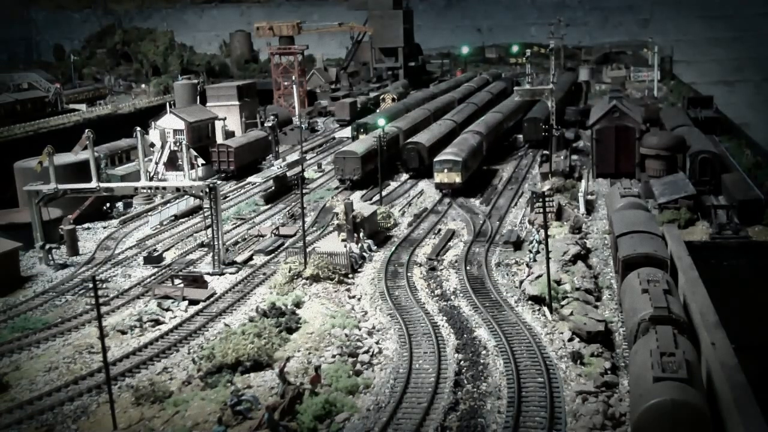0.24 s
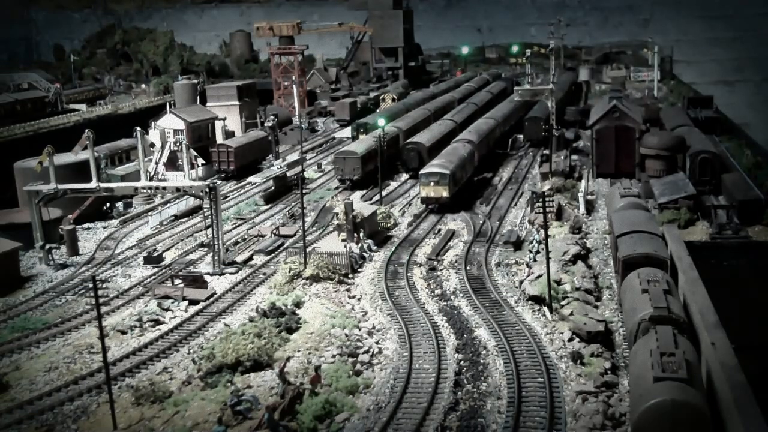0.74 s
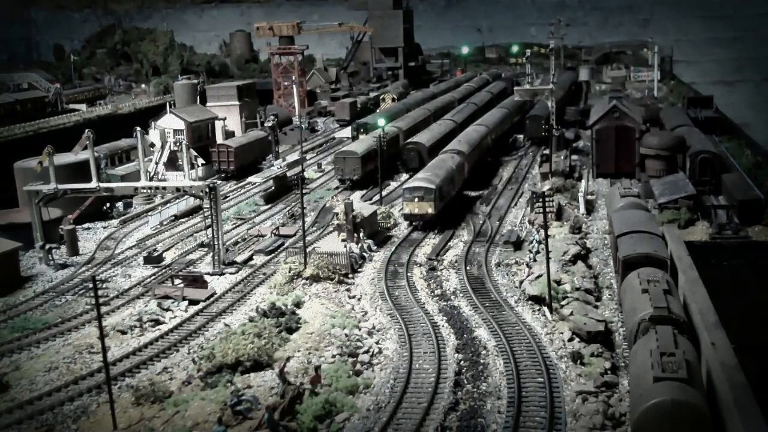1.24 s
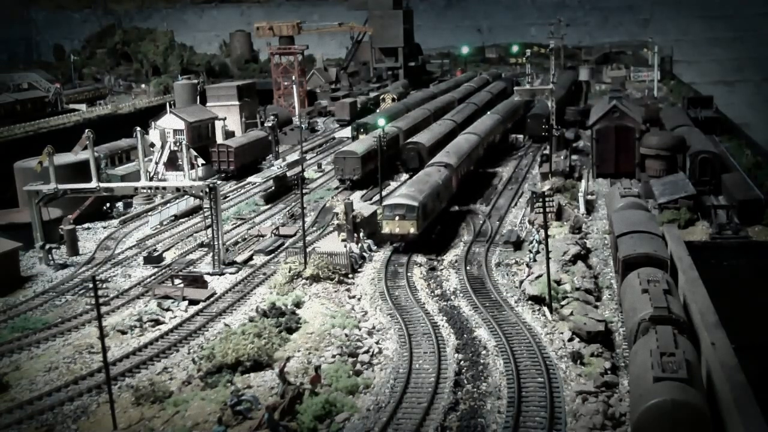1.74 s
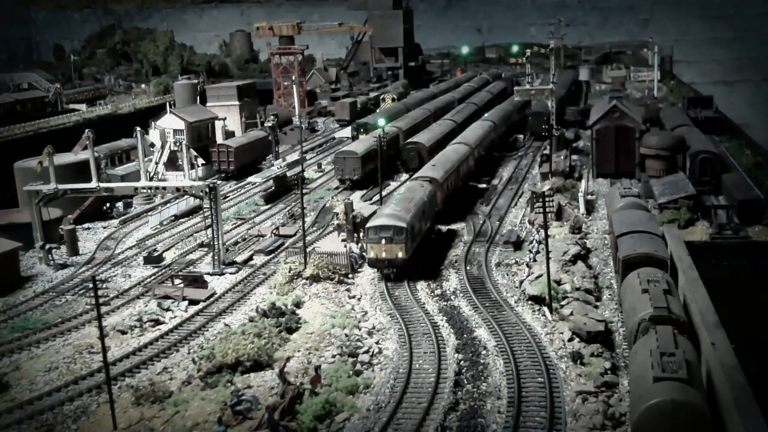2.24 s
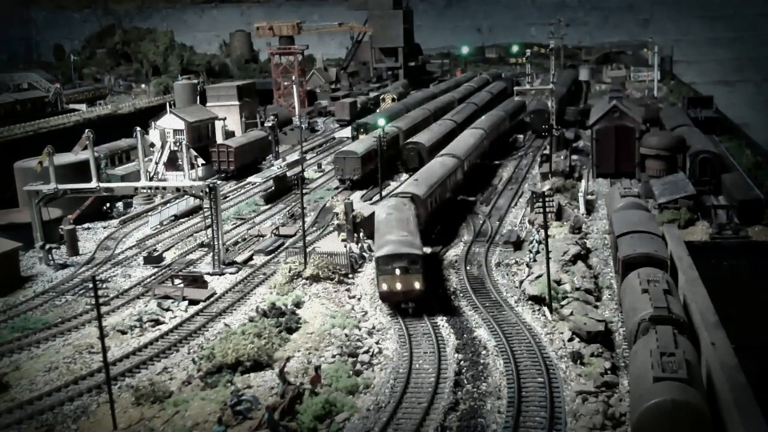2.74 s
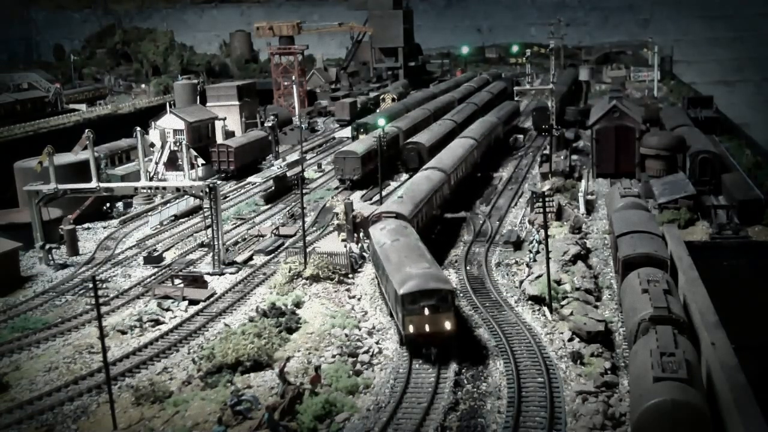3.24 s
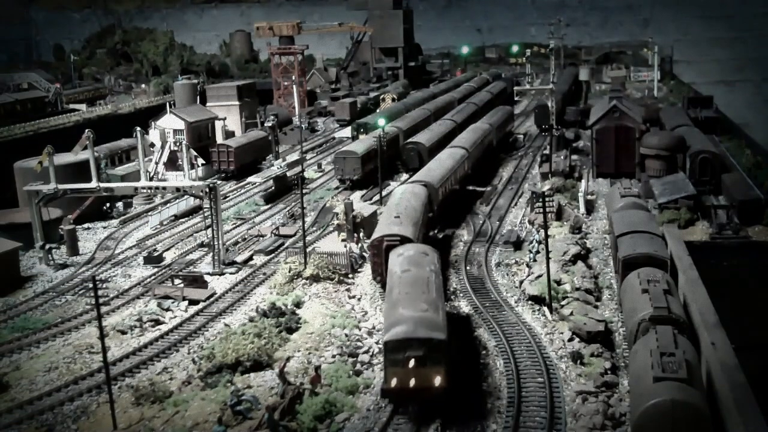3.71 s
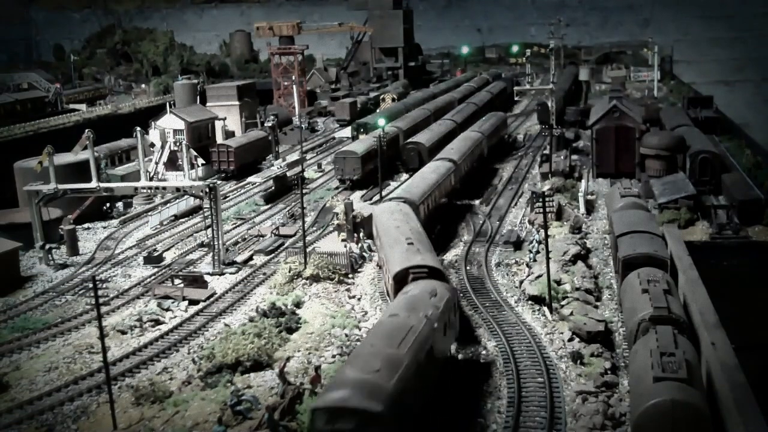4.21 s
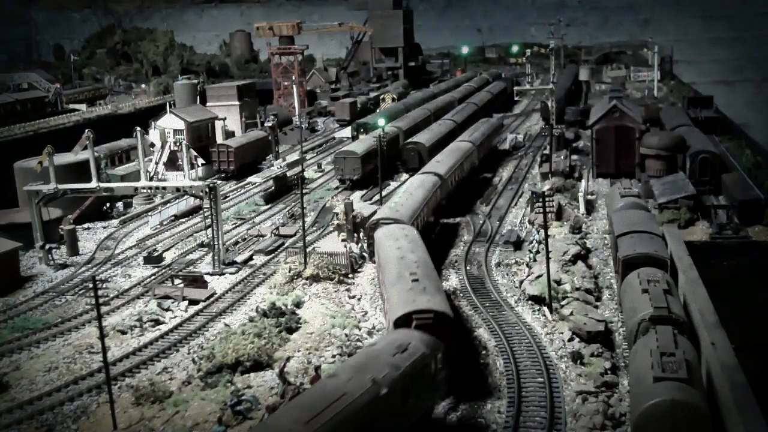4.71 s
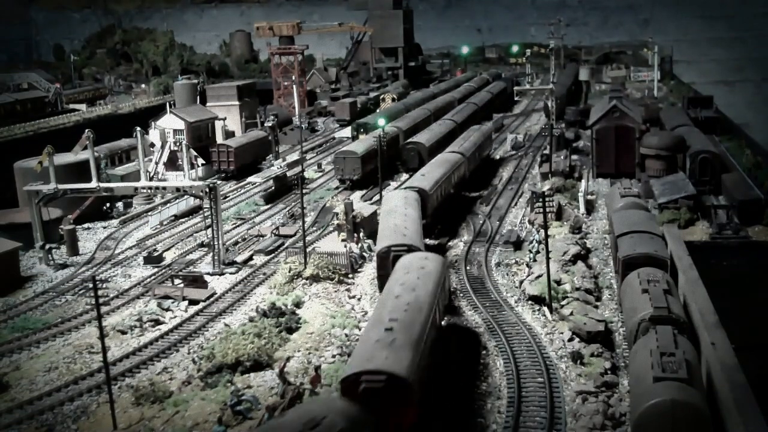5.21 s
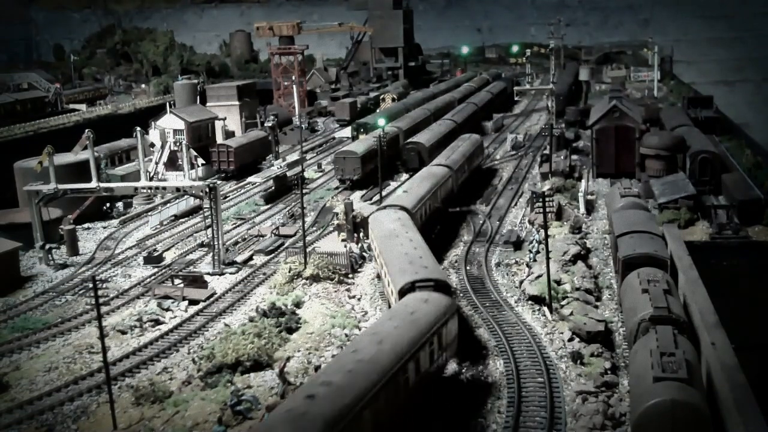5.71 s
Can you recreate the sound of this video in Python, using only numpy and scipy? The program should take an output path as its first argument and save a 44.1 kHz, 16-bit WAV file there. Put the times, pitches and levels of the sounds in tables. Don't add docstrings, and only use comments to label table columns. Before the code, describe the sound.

Indoors on a hobby layout, a small model locomotive pulls coaches towards a close stereo microphone. Faint hissing wheels come first, then rapid plastic-shell knocking builds within a second. Around three seconds a thin gear whine rises, holds steady and stops; the rattle softens, then strengthens again as coaches keep rolling past.

```python
import sys
import numpy as np
from scipy import signal
from scipy.fft import rfft, irfft, next_fast_len
from scipy.io import wavfile
from scipy.ndimage import uniform_filter1d, map_coordinates

SR = 44100
rng = np.random.default_rng(int(sys.argv[2]) if len(sys.argv) > 2 else 0)


def gain_from_db(level_db):
    decades = np.asarray(level_db, float) / 20
    return 10 ** decades


def master_out(mix):
    frames = np.transpose(np.atleast_2d(mix))
    ceiling = np.clip(frames, -1, 1)
    pcm = np.round(ceiling * 32767).astype(np.int16)
    wavfile.write(sys.argv[1], SR, pcm)


N = 262836

# frequency in Hz, left-right correlation (0-1).
PORT_LIKENESS = [(25, .3), (60, 0.7), (150, .92), (1000, 0.91), (1600, 0.79), (2000, 0.92), (2800, 0.64),
                 (3200, 0.8), (3900, .3), (4600, 0.75), (5100, 0.81), (5700, 0.97), (6200, .2),
                 (6700, 0.94), (7300, 0.35), (11000, .1)]


def unit(x):
    return x / np.sqrt(np.mean(x ** 2) + 1e-20)


def along(points, hz):
    f, v = np.transpose(points)
    return np.interp(np.log(hz + 1), np.log(f + 1), v)


def curves(rows):
    s, *cols = np.transpose(rows)
    return [np.interp(np.arange(N) / SR, s, c) for c in cols]


def wobble(rate_hz):
    knots = rng.standard_normal(int(N * rate_hz / SR) + 4)
    return map_coordinates(knots, [np.arange(N) * rate_hz / SR])


def filtered(x, response):
    m = next_fast_len(N + 8192)
    return irfft(rfft(x, m) * response(np.fft.rfftfreq(m, 1 / SR)), m)[..., :N]


def ringing(x, modes):
    f = np.fft.rfftfreq(next_fast_len(N + 8192), 1 / SR)
    h = 0
    for k, (centre_hz, width_hz, db) in enumerate(modes):
        damping = 1j * f * width_hz
        h = h + (-1) ** k * gain_from_db(db) * damping / (centre_hz ** 2 - f * f + damping)
    h = h * np.abs(h) ** 0.33
    return filtered(x, lambda hz: h / np.sqrt(np.mean(np.abs(h) ** 2)))


def rush(spectrum, patchy_db):
    z = signal.stft(rng.standard_normal((2, N)), nperseg=512)[2]
    field = uniform_filter1d(rng.standard_normal(z.shape[1:]), size=4, axis=0)
    field = uniform_filter1d(field, size=8, axis=1)
    pair = signal.istft(z * gain_from_db(patchy_db * unit(field)), nperseg=512)[1][:, :N]
    return unit(filtered(pair, lambda hz: gain_from_db(along(spectrum, hz))))


def bursts(at_s, level_db, rise_s, t60_s, rough_db, blow, between_db):
    starts = np.bincount((at_s * SR).astype(int), gain_from_db(level_db) ** 2, N)
    t = np.arange(SR // 5) / SR
    shape = ((1 - np.exp(-t / rise_s)) * gain_from_db(-60 * t / t60_s)) ** 2
    power = signal.fftconvolve(starts, shape / shape.max())[:N]
    power = np.roll(power, -round(0.0027 * SR))
    power = power + gain_from_db(between_db) ** 2 * uniform_filter1d(power, size=SR // 10)
    grain = unit(gain_from_db(rough_db * wobble(400)) * rng.standard_normal((2, N)))
    contacts = np.sqrt(np.abs(power)) * grain
    blows = np.sqrt(starts * shape.sum() / shape.max()) * rng.choice([-1, 1], (2, N))
    blows = np.roll(blows, round(0.002 * SR), axis=1)
    return np.sqrt(1 - blow) * contacts + np.sqrt(blow) * blows


def wheels():
    # time in s, nearness (0-1), flange scrape in dB.
    passing = [(0, 0.02, 1.8), (.5, 0, 3.5), (.88, 0, 2.5), (1.08, 0.4, 9), (1.3, 0.7, 3.5),
               (1.55, 0.42, -1), (2, 0.52, -1.7), (2.75, 0.88, -1.5), (3.5, 0.79, -0.5), (4.08, 0.7, 0.6),
               (4.4, 0.82, -1.7), (4.8, 0.84, 0), (5.28, 1, 1.5), (5.6, 1, 0), (5.96, .98, -1.1)]
    # Hz, dB per Hz.
    roll_spectrum = [(240, -51), (400, -17.5), (648, -12.5), (800, -6.5), (1060, -0.5), (1170, -5),
                     (1400, -1), (1680, -4), (1900, -3), (2420, -3), (2690, -8), (3300, -10.5), (3780, -56),
                     (4000, -36), (5200, -31), (8800, -120)]
    hiss_spectrum = [(2060, -45), (3450, -5), (3900, -7), (4420, -1), (5020, 1), (5670, -2.5), (6710, -8.5),
                     (7470, -13), (8060, -32.5), (9010, -28), (10900, -44), (11800, -41), (15300, -84),
                     (22000, -120)]
    fizz_spectrum = [(6650, -25), (11300, -10), (11900, -18), (13700, 2), (14500, -25)]
    sheen_spectrum = [(6400, -40), (7300, 3.5), (8100, -7.5), (8900, -6), (9700, -23.5), (10800, -13),
                      (11800, -38)]
    board_spectrum = [(12, -49), (20, -13), (70, -14), (97, -6), (129, -9.5), (172, -0.5), (214, -1.5),
                      (293, -5.5), (360, -3), (424, -16.5), (520, -6.5), (680, 1), (1140, -120)]
    near, scrape_db = curves(passing)
    roll_db = -33 + 2.5 * near + 0.24 * scrape_db + 0.4 * wobble(9)
    hiss_db = -31.5 + scrape_db + 0.32 * wobble(11)
    fizz_db = -80 + 15 * near + 0.5 * wobble(9.3)
    sheen_db = -67 + 22 * near + 1.2 * wobble(12)
    rumble_db = -55.5 + 4 * near
    out = gain_from_db(roll_db) * rush(roll_spectrum, patchy_db=2.0)
    out += gain_from_db(hiss_db) * rush(hiss_spectrum, patchy_db=2.2)
    out += gain_from_db(fizz_db) * rush(fizz_spectrum, patchy_db=2.5)
    out += gain_from_db(sheen_db) * rush(sheen_spectrum, patchy_db=2)
    return out + gain_from_db(rumble_db) * rush(board_spectrum, patchy_db=1.5)


def hum():
    # frequency in Hz, level in dB.
    layout_tones = [(365, -65), (6092, -51)]
    t = np.arange(N) / SR
    out = 0
    for hz, db in layout_tones:
        start_phase = rng.uniform(0, 2 * np.pi, (2, 1))
        drift = hz / 1800 * wobble(25) + 1.0 * wobble(7.4)
        out = out + gain_from_db(db + 3 * wobble(5.1)) * np.sin(2 * np.pi * hz * t + start_phase + drift)
    return np.sqrt(2) * out


def knocks():
    # start in s, strength in dB, extra on first tooth in dB, box ring in dB, rattle in dB.
    gear_turns = [(0.091, -17, -7, -18, -9.5), (0.4236, -11.5, 1, -12.5, -9.5),
                  (.7532, -8, 1.5, -12, -10.5), (1.0403, -9, 3.5, -12.5, -9),
                  (1.3179, -7.5, 5.5, -13.5, -10.5), (1.5883, -7.5, 3, -12, -11.5),
                  (1.8467, -9, 4, -12, -10.5), (2.0978, -8, 3, -13, -11.5), (2.3453, -9.5, 6, -14, -13.5),
                  (2.59, -7.5, 2.5, -14.5, -13.5), (2.83, -8.5, 5, -14, -14.5),
                  (3.0703, -10.5, 5, -9.5, -15), (3.3106, -12.5, 4, -7, -13.5),
                  (3.5513, -13, 3.5, -6, -11.5), (3.783, -14.5, -1, -6.5, -9), (4.016, -15.5, 2.5, -6, -8),
                  (4.253, -15.5, 1, -6, -7.5), (4.4897, -14.5, 1.5, -2.5, -9.5),
                  (4.7234, -14, -0.5, -6, -6.5), (4.964, -10.5, -0.5, -10.5, -8),
                  (5.2002, -11, 0.5, -9.5, -7.5), (5.434, -8.5, 1, -18.5, -10),
                  (5.6705, -10.5, 2.5, -18.5, -11), (5.9042, -11.5, 2, -18, -12.5)]
    # place in the turn (0-1), strength in dB, box ring in dB, rattle in dB.
    worn_teeth = [(0, -1.5, -2, 1.5), (.188, -1.5, -5, -2.9), (.336, 0.4, 1.5, -0.4),
                  (0.515, -0.6, -1.7, -1.4), (0.667, -2.6, 0.5, 1.1), (0.845, -1, -4.5, -2.3)]
    # time in s, strength in dB, box ring in dB, rattle in dB.
    extra_knocks = [(.065, -20, -9, -6), (.095, -20.5, -3.5, -11), (.131, -26, -3, -19),
                    (.158, -27, -16, -19), (.698, -12, -14, -18), (1.672, -17.5, -2, -27),
                    (2.957, -14.5, -7, -23), (4.177, -24.5, 5, -16), (4.378, -20, -2, -7),
                    (4.566, -21.5, -3.5, -2), (4.645, -17.5, -8, -8), (3.471, -22, -1.5, -19),
                    (5.282, -20, -2, -7)]
    jitter_s, scatter_db, colour_db = 0.0015, 0.8, 1.2
    start, db, first_db, box_db, rattle_db = np.transpose(gear_turns)[..., None]
    place, tooth_db, tooth_box_db, tooth_rattle_db = np.transpose(worn_teeth)
    length = np.diff(start, axis=0)[np.r_[:len(gear_turns) - 1, -1]]
    luck = rng.standard_normal((len(gear_turns), len(worn_teeth), 4))
    at = start + place * length + jitter_s * luck[..., 0] * (place > 0)
    db = db + tooth_db + first_db * (place == 0) + scatter_db * luck[..., 1]
    box_db = box_db + tooth_box_db + colour_db * luck[..., 2]
    rattle_db = rattle_db + tooth_rattle_db + colour_db * luck[..., 3]
    inside = at < N / SR
    extras = np.transpose(extra_knocks)
    return [np.r_[v[inside], extra] for v, extra in zip((at, db, box_db, rattle_db), extras)]


def drive():
    # time in s, side panel share of rattle (0-1), low box mode share (0-1), thud in dB.
    facing = [(0, 1, 1, -8), (.7, 0.33, 0, -19), (1.3, 0.44, 0.2, -15), (2, 0.19, 0.3, -16),
              (2.8, 0.21, 0.78, -15), (3.5, 0.18, 0.8, -10.5), (4.2, 0.61, 0.74, -4), (4.8, 0.78, 0.73, -6),
              (5.4, 0.79, 0.97, -14.5), (5.96, 0.97, 0, -9.5)]
    # time in s, level in dB.
    roof_seen = [(0, -19.5), (1.3, -19.5), (3.1, -19.5), (3.6, -20.5), (4.6, -21.5), (5, -18.5),
                 (5.96, -18.5)]
    # centre in Hz, width in Hz, level in dB.
    box_low_modes = [(1937, 67, -2), (2423, 77, -7.5)]
    box_high_modes = [(1846, 58, 1), (2117, 116, 0), (2390, 84, 3)]
    roof_modes = [(2920, 176, 1.5), (3174, 49, 11), (3400, 43, 4)]
    ridge_modes = [(3400, 170, 0)]
    panel_modes = [(4436, 380, 5), (4856, 296, 12.5), (4990, 310, 8), (5700, 50, 5.5), (7020, 54, 2.5)]
    nose_modes = [(4800, 280, 2.5), (5450, 152, 2.5), (5764, 80, 6.5), (6660, 420, 1.5), (8450, 1900, -14),
                  (10930, 330, -24)]
    thud_modes = [(815, 84, 0), (1047, 49, 1), (1250, 108, 0), (1572, 260, -2)]
    at, db, box_db, rattle_db = knocks()
    panels, low, thud_db = curves(facing)
    panels, low = np.sqrt(np.clip([panels, low], 0, 1))
    roof_db = np.interp(at, *np.transpose(roof_seen)) + 1.56 * rng.standard_normal(len(db))

    box = bursts(at, db + box_db - 2, rise_s=0.0049, t60_s=0.14, rough_db=4.0, blow=0.08, between_db=-7.5)
    roof = bursts(at, db + roof_db, rise_s=0.0054, t60_s=0.13, rough_db=2.5, blow=0.08, between_db=-10)
    rattle = bursts(at, db + rattle_db - 1.5, rise_s=0.0077, t60_s=0.076, rough_db=1.5, blow=0,
                    between_db=-11.5)
    thud = bursts(at, db - 11.5, rise_s=0.007, t60_s=0.16, rough_db=-0.5, blow=0, between_db=-7.5)

    shell = ringing(low * box, box_low_modes)
    shell += ringing(np.sqrt(1 - low ** 2) * box, box_high_modes)
    shell += ringing(np.sqrt(1 - panels ** 4) * roof, roof_modes)
    shell += ringing(gain_from_db(-0.5) * panels ** 2 * roof, ridge_modes)
    shell += ringing(panels * rattle, panel_modes)
    shell += ringing(np.sqrt(1 - panels ** 2) * rattle, nose_modes)
    shell += ringing(gain_from_db(thud_db) * thud, thud_modes)
    top_hz, order = 11300, 12
    return filtered(shell, lambda hz: 1 / np.sqrt(1 + (hz / top_hz) ** (2 * order)))


def whine():
    # time in s, mesh rate in Hz, level in dB.
    mesh_course = [
        (2.9, 725, -73),
        (2.97, 731, -45.5),
        (3.08, 747, -36),
        (3.2, 799, -39.5),
        (3.31, 841, -38.5),
        (3.46, 859, -39),
        (4.36, 857, -41),
        (4.43, 885, -70),
        (4.5, 856, -79),
    ]
    # level while rising in dB, level once steady in dB, swell in dB, time of a peak in s, period in s.
    overtones = [(-1.2, -1, 3.5, 3.58, .22), (-21, 5, 1.5, 4, 0.31), (-14, 0.9, 4.5, 3.86, 0.28),
                 (-13, -4, 5.5, 4.1, 0.62), (-15, -3, 9.5, 3.52, .565), (-21, 0, 3.5, 3.72, .36)]
    lock_s, settle_s = 3.43, 0.036
    fade_db_per_s = -7
    mesh_hz, level_db = curves(mesh_course)
    phase = 2 * np.pi * np.cumsum(mesh_hz) / SR + 0.24 * wobble(17)
    t = np.arange(N) / SR
    steady = 1 / (1 + np.exp((lock_s - t) / settle_s))
    gear = 0
    for k, (rise_db, steady_db, swell_db, peak_s, period_s) in enumerate(overtones):
        swell = swell_db * np.cos(2 * np.pi * (t - peak_s) / period_s)
        db = rise_db + steady * (steady_db - rise_db + swell)
        if k == 0:
            db = db + fade_db_per_s * np.maximum(t - lock_s, 0)
        start_phase = rng.uniform(0, 2 * np.pi, (2, 1))
        gear = gear + gain_from_db(db + 1.5 * wobble(14)) * np.sin((k + 1) * phase + start_phase)
    return np.sqrt(2) * gain_from_db(level_db) * gear


def scene():
    def split(hz):
        angle = np.arccos(np.clip(along(PORT_LIKENESS, hz), -1, 1)) / 2
        return np.array([np.cos(angle), np.sin(angle)])
    alike, unlike = filtered(wheels() + hum() + drive() + whine(), split)
    return np.array([alike + unlike, alike - unlike])


def top_cut(x):
    return signal.sosfilt(signal.butter(12, 15040, fs=SR, output="sos"), x)


def record(dry):
    # frequency in Hz, lead in radians.
    port_lead = [(100, 0.16), (3000, -0.23), (4000, 0.91), (4600, 0.78), (5600, 2.5), (6200, -1),
                 (7000, -0.92), (8300, .8), (11000, 1.2)]
    # frequency in Hz, left minus right in dB.
    port_tilt = [(100, 0), (3500, -1), (4300, -1), (5300, -6.5), (6200, -1.5), (6600, 2.5), (7200, 14),
                 (8000, 30), (8700, 10), (9600, 16), (10600, 26), (11300, 25), (11800, 4), (13500, 36)]
    top_hz = 14430

    def ports(hz):
        ratio, lead = gain_from_db(along(port_tilt, hz)), along(port_lead, hz)
        summed = 1 + ratio ** 2 + 2 * ratio * along(PORT_LIKENESS, hz) * np.cos(lead)
        gain = 2 * np.array([ratio, np.ones_like(hz)]) / np.sqrt(summed)
        return (hz < top_hz) * gain * np.exp(0.5j * np.array([[-1], [1]]) * lead)
    return top_cut(filtered(dry, ports))


dry = scene()
out = record(dry)
master_out(out)
```